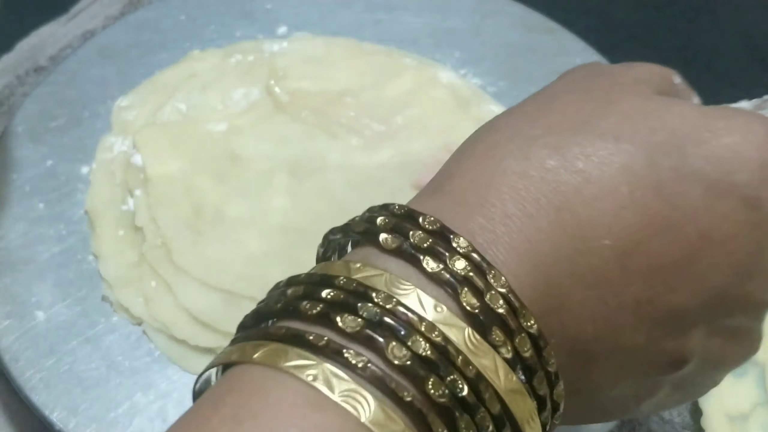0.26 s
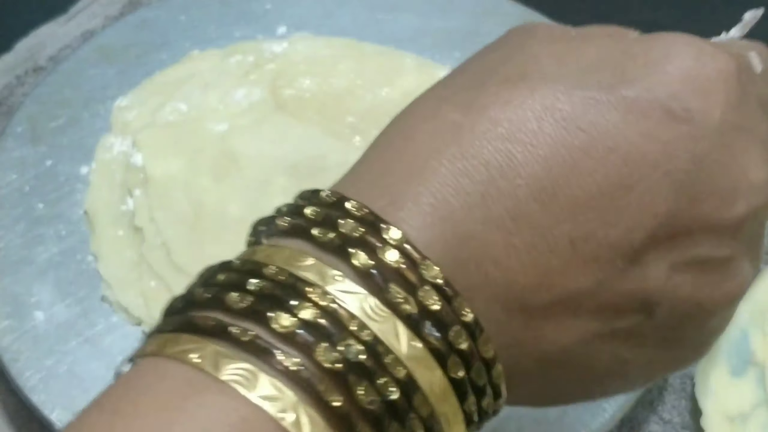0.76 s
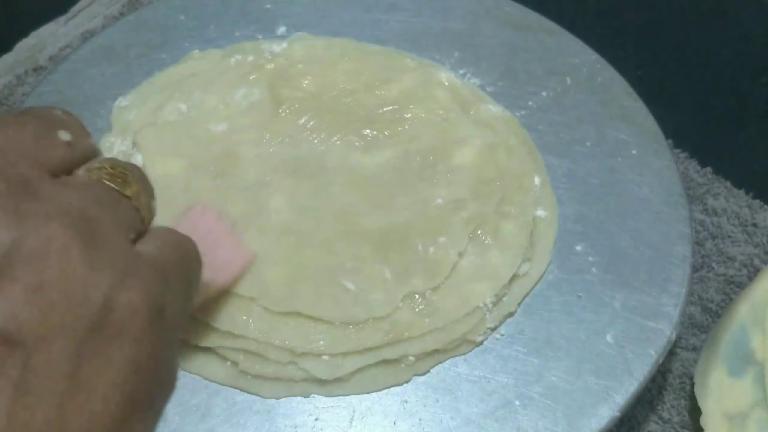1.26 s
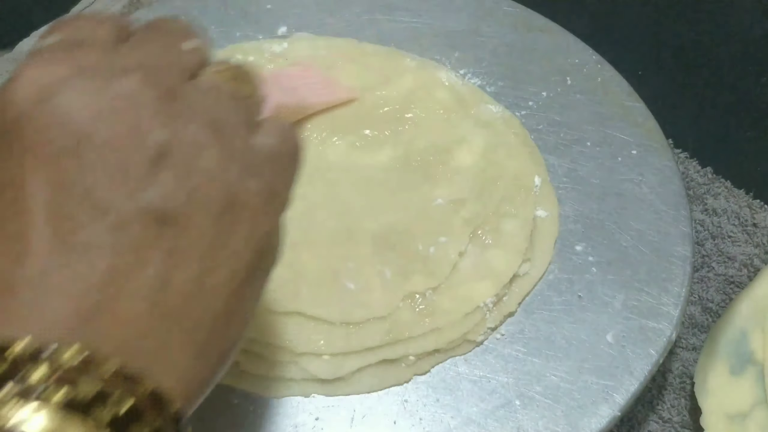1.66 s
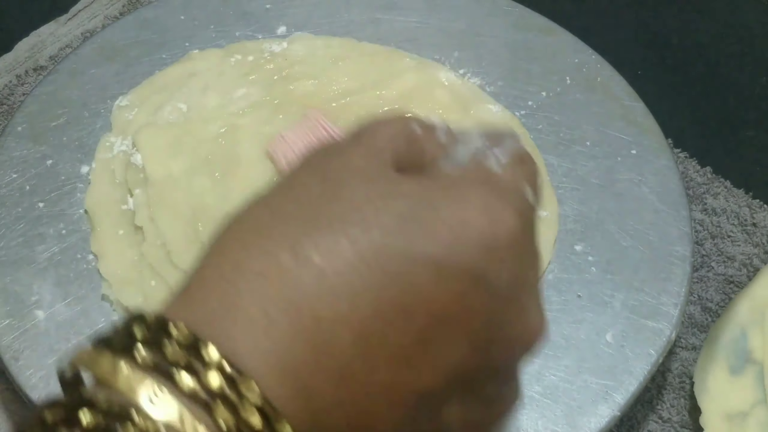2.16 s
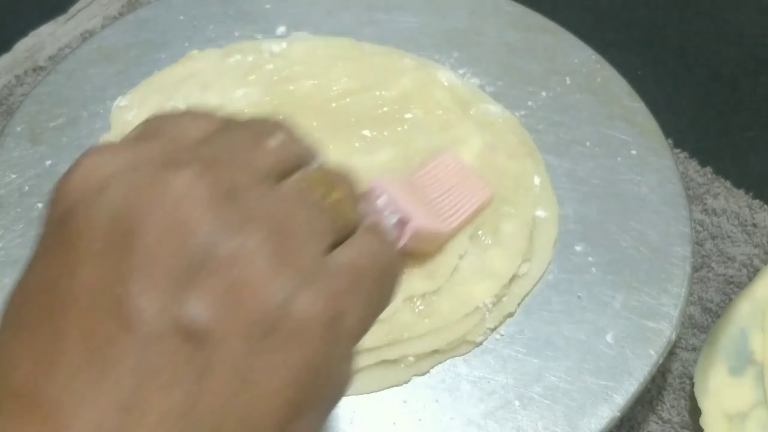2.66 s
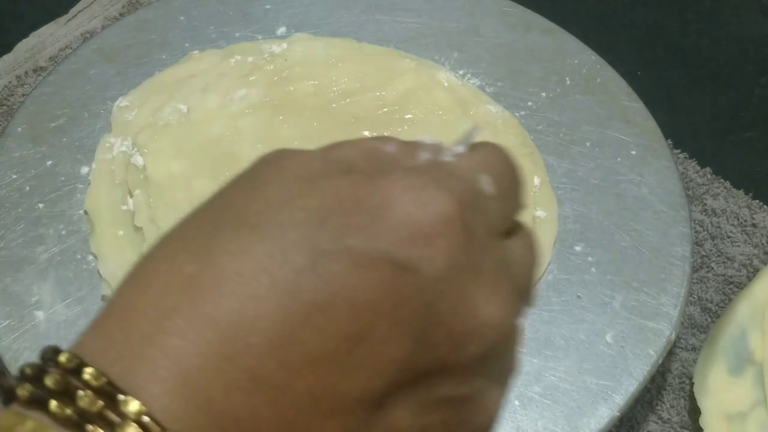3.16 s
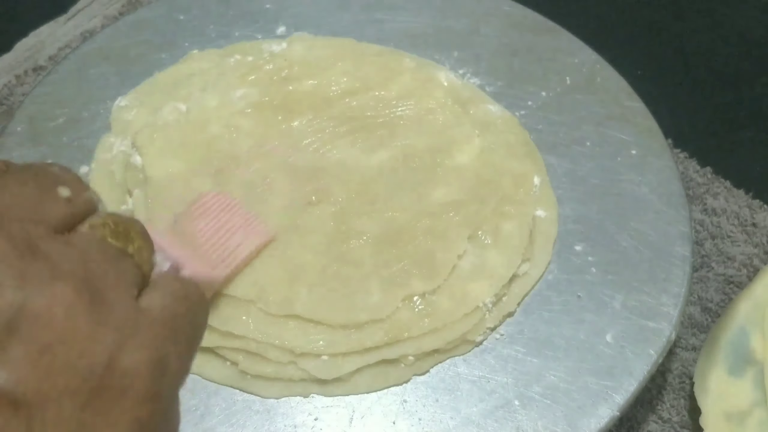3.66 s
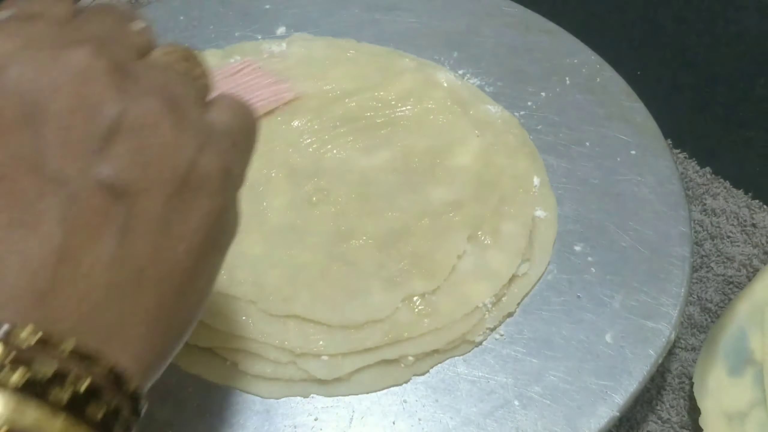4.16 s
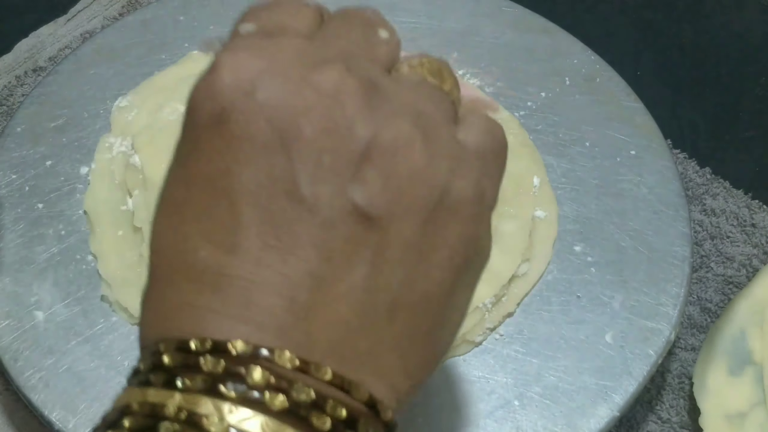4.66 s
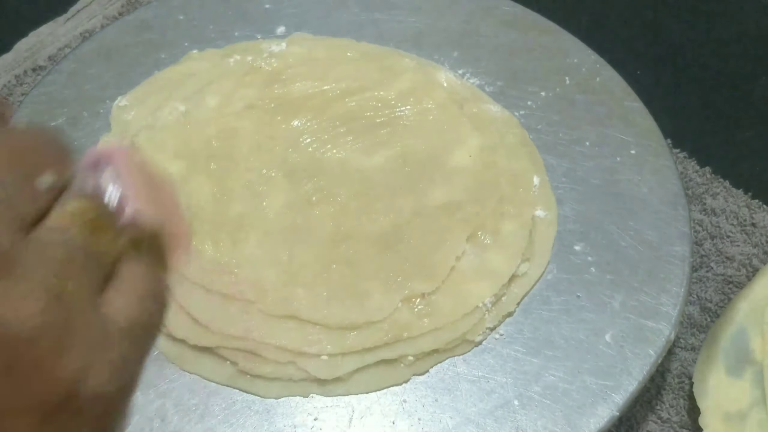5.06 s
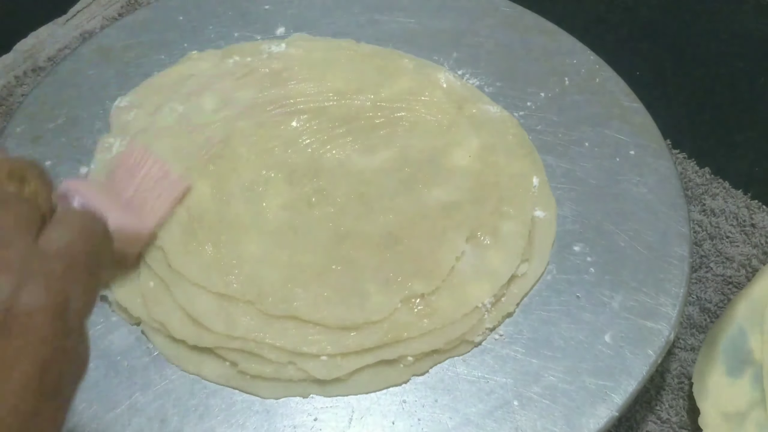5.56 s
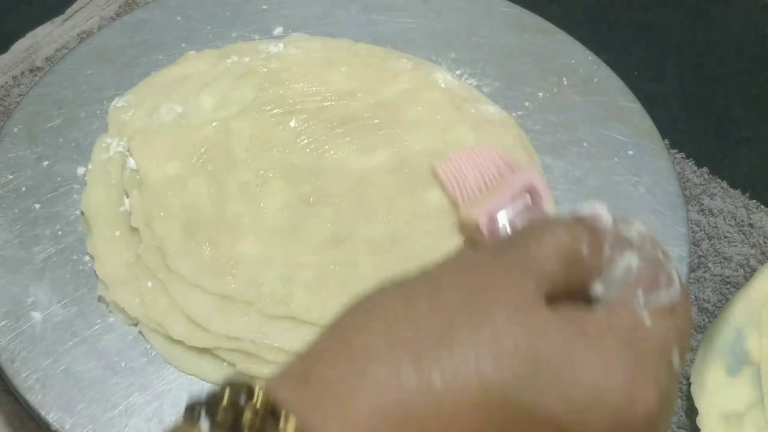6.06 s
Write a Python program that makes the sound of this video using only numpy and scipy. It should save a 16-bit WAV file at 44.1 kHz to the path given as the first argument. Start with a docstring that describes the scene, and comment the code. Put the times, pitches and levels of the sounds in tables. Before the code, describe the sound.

Metal bangles clink on a wrist close to the microphone, toward the left, as a hand brushes paste over dough in a small kitchen. Each clink is a quick, very bright chatter of tiny hits that dies almost at once, leaving a short room tail. The first second holds lighter ticks, with clearer ones near 0.4 and 0.8 seconds. Stronger clinks and clusters follow unevenly, around 1.4, 1.6, 1.9, 2.6, 3.5, 3.8, 4.0, 4.5, 5.3, 5.7 and 5.9 seconds, with smaller clicks between and a last one near 6.3 seconds. In the gaps the bangles slide with a thin hiss and the brush swishes faintly with each stroke. The hand rubs the board softly near 0.8 and 5.6 seconds and bumps it lightly at 3.8. Quiet room noise and a wavering low hum lie under everything.

```python
"""In a small kitchen, metal bangles clink on a wrist close to a phone while the hand brushes paste on dough.
Each knock is a quick chatter of tiny hits. The bangles damp each other, so they ring only briefly,
and the room carries the tail. Between knocks the bangles slide, the brush swishes faintly and the hand
rubs or bumps the board. Room noise and a wavering low hum lie under it all."""
import sys
import numpy as np
from scipy import signal
from scipy.fft import rfft, irfft
from scipy.io import wavfile
from scipy.ndimage import uniform_filter1d

SR = 44100
rng = np.random.default_rng(int(sys.argv[2]) if len(sys.argv) > 2 else 0)


def waveform_to_disk(signal):
    """Save audio, clipped to [-1, 1], as 16-bit WAV at the path in sys.argv[1]."""
    frames = np.transpose(np.atleast_2d(signal))
    scaled = np.clip(frames, -1, 1) * 32767
    samples = np.round(scaled).astype(np.int16)
    wavfile.write(sys.argv[1], SR, samples)


N = 278883

# The tone of the room noise. Each row: frequency in Hz, relative level in dB.
ROOM_COLOUR = [(18, -16), (33, 1), (46, -5), (95, -0.5), (160, -4), (235, -3), (305, -11), (400, -6),
               (680, -10), (1390, -22.5), (4300, -40.5), (7000, -48), (9500, -55), (16000, -68)]
# How alike the room noise is left and right. Each row: frequency in Hz, likeness from 0 to 1.
ROOM_LIKENESS = [(60, 0.98), (125, 0.9), (250, 0.85), (500, 0.62), (1000, 0.19), (4000, 0.014)]
# How the two hums swell and sink. Each row: time in seconds, relative level in dB.
LOW_HUM_LEVELS = [(0.0, -60), (0.7, -61), (1.65, -72), (1.76, -50), (1.95, -51), (2.12, -64), (2.55, -48),
                  (3.0, -59.5), (3.45, -53), (3.62, -61.5), (3.95, -58), (4.04, -47), (4.33, -42.5),
                  (4.54, -57), (4.7, -52), (4.83, -66), (5.0, -47), (5.4, -53), (6.0, -54), (6.32, -64)]
UPPER_HUM_LEVELS = [(0.0, -65), (1.39, -61), (1.6, -61), (3.06, -55), (3.24, -74), (3.8, -59), (4.79, -70),
                    (5.63, -52.5), (6.32, -62)]
# Weak drones around the hums. Each row: pitch in Hz, width in Hz, level in dB.
WEAK_DRONES = [(101.2, 10.5, -64.5), (183.1, 21, -63.5), (211.1, 13.7, -60.5), (239.2, 12, -65.5),
               (371.1, 10.6, -69)]
# Strokes of the arm. Each row: middle in seconds, half length in seconds,
# relative brush level in dB, relative slide level in dB.
ARM_STROKES = [(0.01, 0.12, -59, -74), (0.76, 0.15, -68, -63.5), (1.284, 0.057, -68.5, -57.5),
               (1.72, 0.27, -71.5, -63), (2.268, 0.14, -67, -63), (2.76, 0.13, -67, -60),
               (3.18, 0.083, -64.5, -73), (3.675, 0.17, -71, -62), (4.222, 0.46, -73, -61.5),
               (4.665, 0.42, -68, -59.5), (5.158, 0.27, -94, -71), (5.607, 0.22, -63.5, -60.5),
               (6.304, 0.074, -67, -58)]
# The tone of the brush and of sliding bangles. Each row: frequency in Hz, relative level in dB.
BRUSH_TONE = [(1000, -14), (2000, -2), (4200, -4), (6500, -8.5), (9000, -17.5)]
SLIDE_TONE = [(9000, -36), (10500, 7), (12000, 12), (14000, 17), (15400, 15), (15750, -20)]
# The notes a bangle rings with. Each row: pitch in Hz, relative level in dB, seconds to fade by 60 dB.
BANGLE_NOTES = [(2150, -22, .03), (3350, -12, .03), (4230, -12, 0.024), (5220, -12, 0.089),
                (5420, -11, .06), (5820, 0.5, 0.048), (6300, -10, 0.05), (6760, -6, .055),
                (7350, -3.5, 0.046), (8060, -5.5, 0.015), (10100, -14, 0.045), (11120, 1, 0.027),
                (12740, -3.5, 0.057), (14100, -12.5, .012), (15300, 0, 0.033)]
# Knocks of bangle on bangle. Each row: start in seconds, strength in dB, chatter length in seconds,
# extra snap and body in dB, the high frequency in Hz that the struck spot brings out.
BANGLE_KNOCKS = [(0.05, -44, 0.0067, -7, 11300), (0.074, -39, 0.012, 3, 11200),
                 (0.353, -42, 0.0023, 2, 11700), (0.3563, -29, 0.0038, 4, 12300),
                 (0.503, -39.5, 0.0024, -6, 11300), (0.52, -42, .002, -11, 11300),
                 (0.6038, -37.5, 0.0038, 1.5, 11000), (0.647, -47.5, .002, -3, 11400),
                 (0.8288, -22.5, 0.00097, 1.5, 11700), (0.97, -54, .002, -4, 13000),
                 (1.01, -39, 0.0082, 2.5, 11300), (1.019, -33.5, 0.0074, 0, 11000),
                 (1.0245, -28, 0.0038, -3, 11000), (1.0398, -38, 0.0018, 3.5, 11200),
                 (1.3465, -25.5, .003, -2.5, 12400), (1.3772, -20.5, 0.0052, 1, 12000),
                 (1.547, -48, .004, -6, 11500), (1.557, -22, 0.0071, 0, 10500),
                 (1.5886, -24.5, 0.011, 3, 12700), (1.5927, -19, .007, 2.5, 12200),
                 (1.872, -47.5, 0.0093, -8, 12500), (1.9495, -20, 0.01, 2.5, 11900),
                 (2.12, -43.5, 0.0042, -4, 12500), (2.133, -43, 0.0097, -3, 12500),
                 (2.144, -28.5, .011, -0.5, 12500), (2.1544, -28, 0.0039, 1.5, 14500),
                 (2.247, -47.5, 0.041, -1.5, 11900), (2.38, -47, 0.0035, -5, 11500),
                 (2.388, -38, .003, -11, 11600), (2.391, -35.5, 0.004, -2, 11800),
                 (2.57, -43, 0.0087, -2, 12500), (2.581, -30.5, 0.01, 3, 12500),
                 (2.5924, -15.5, 0.003, 2.5, 14600), (2.604, -36, 0.0087, -3, 12500),
                 (2.617, -28, 0.0052, 0, 12500), (2.784, -40, 0.011, -6, 12300),
                 (3.0834, -26, 0.0046, 0, 11600), (3.186, -41.5, .003, -1.5, 12500),
                 (3.279, -43.5, 0.0066, -5, 12300), (3.427, -25.5, 0.01, 2, 11900),
                 (3.472, -19, 0.0051, 5, 14400), (3.488, -25.5, 0.006, -2.5, 14200),
                 (3.732, -46, 0.005, -6, 12000), (3.7466, -37.5, 0.0096, -8, 12200),
                 (3.7883, -18.5, 0.0048, 1, 12160), (3.998, -21, 0.0043, 0, 13600),
                 (4.007, -28, 0.0078, 1, 12500), (4.02, -23.5, 0.0092, 2, 12500),
                 (4.441, -51, 0.011, -6, 12500), (4.4795, -18.5, 0.0034, -1.5, 11700),
                 (4.635, -25, 0.0027, -2, 14900), (4.663, -30.5, 0.013, 2.5, 13000),
                 (4.693, -33.5, 0.0067, 0, 12700), (4.921, -51, .008, -10, 12100),
                 (4.9388, -30.5, 0.0087, -3, 11850), (5.278, -24, 0.002, -3, 13700),
                 (5.289, -31, 0.003, 2.5, 13600), (5.309, -29, 0.011, 2.5, 13000),
                 (5.426, -43, 0.0028, -6, 12600), (5.4645, -40, 0.0022, 1, 12700),
                 (5.654, -36.5, 0.0062, -3, 12600), (5.6822, -17.5, 0.0039, 2, 12000),
                 (5.691, -24, 0.0044, 1.5, 11900), (5.917, -41, 0.0044, -1, 12400),
                 (5.93, -35, 0.0044, -3, 12800), (5.9373, -25, 0.0021, 4.5, 13700),
                 (5.94, -24.5, 0.0059, -3, 13000), (6.2598, -30, 0.0087, -4, 12000),
                 (6.271, -27.5, 0.004, 0, 12200)]
# A knock's dry snap, body and bright top. Each row: frequency in Hz, relative level in dB.
SNAP_TONE = [(1100, -25.5), (1900, -1), (2700, -6.5), (4200, -5.5), (7000, 2.5), (8400, -2.5), (9600, -27),
             (11000, -58.5)]
BODY_TONE = [(900, -23), (1900, -6.5), (3300, -9.5), (4900, -0.5), (5600, 8.5), (6900, 1), (7600, -6.5),
             (8300, -10.5), (9100, -16), (11000, -43)]
BRIGHT_TONE = [(9000, -59), (9800, -16.5), (10450, -2), (11100, 4), (12500, -1.5), (13500, 2), (15400, -3),
               (15700, -4), (16600, -45)]
# The hand and brush on the board: rubs, a bump and a short brush swish. Each row: middle in seconds, half
# length in seconds, pitch in Hz, width in Hz, level in dB.
RUBS_AND_BUMPS = [(0.812, 0.19, 600, 200, -58.5), (3.807, 0.033, 90, 72, -45),
                  (4.594, 0.026, 4100, 1100, -63.5), (5.65, 0.11, 616, 770, -57)]


def undb(db):
    """Turn decibels into a number to multiply by."""
    return 10 ** (np.asarray(db) / 20)


def unit(x):
    """Scale a sound to an average (rms) level of 1."""
    return x / np.sqrt(np.mean(x ** 2))


def curve(rows):
    """Join (seconds, value) rows with straight lines."""
    return np.interp(np.arange(N) / SR, *np.transpose(rows))


def over_bins(points, size):
    """Spread (Hz, value) points over every frequency of a spectrum, on a log scale."""
    hz, value = np.transpose(points)
    return np.interp(np.log(np.fft.rfftfreq(size, 1 / SR) + 1), np.log(hz), value)


def colour(x, points, size=2048):
    """Give a sound the tone drawn by (Hz, dB) points; white noise keeps its power."""
    cepstrum = irfft(np.log(unit(undb(over_bins(points, size)))))
    cepstrum[1:size // 2] *= 2  # fold the filter so it never sounds ahead of a hit
    cepstrum[size // 2 + 1:] = 0
    return signal.oaconvolve(x, irfft(np.exp(rfft(cepstrum))))[:len(x)]


def fade(t, t60):
    """Die away by 60 dB in t60 seconds."""
    return np.exp(-np.log(1000) * t / t60)


def swell(s, half_s):
    """A smooth rise and fall around time s."""
    return np.exp(-((np.arange(N) / SR - s) / half_s) ** 2)


def noise_band(hz, width):
    """Noise gathered around one pitch, at level 1."""
    bins = np.fft.rfftfreq(N, 1 / SR)
    return unit(irfft(rfft(rng.standard_normal(N)) / (1 + (2 * (bins - hz) / width) ** 2), N))


def at_peak(x, db):
    """Scale a burst so that its loudest 4 ms have this level."""
    return x * undb(db) / np.sqrt(uniform_filter1d(x ** 2, size=176, mode="constant").max())


def add(track, s, x):
    """Mix a short sound into a track, s seconds in."""
    start = max(int(s * SR), 0)
    track[start:start + len(x)] += x[:max(len(track) - start, 0)]


def right_side(db):
    """Left and right gains that change only the right side."""
    return undb([[0], [db]])


def room_noise(level_db=-52, hiss_db=-75):
    """Noise from all around, alike in both ears only in the bass, plus a thin even hiss."""
    likeness = np.clip(over_bins(ROOM_LIKENESS, N), 0, 1)
    tone = undb(over_bins(ROOM_COLOUR, N))
    mid, side = (irfft(rfft(rng.standard_normal(N)) * tone * np.sqrt(1 + sign * likeness), N)
                 for sign in (1, -1))
    rumble = np.array([mid + side, mid - side]) / np.std(mid)
    return undb(level_db) * rumble + undb(hiss_db) * rng.standard_normal((2, N))


def wavering_tone(hz, width_hz, waver=0.7):
    """A pure tone that wavers because noise close to its pitch beats against it."""
    tone = np.sqrt(2) * np.sin(2 * np.pi * hz * np.arange(N) / SR)
    return unit(tone + waver * noise_band(hz, width_hz))


def hum():
    """Two low hums, each swelling on its own, with weaker drones around them."""
    low = wavering_tone(hz=86.3, width_hz=10) * undb(curve(LOW_HUM_LEVELS) - 1)
    upper = wavering_tone(hz=126.1, width_hz=4.5) * undb(curve(UPPER_HUM_LEVELS) - 2.5)
    drones = sum(undb(db) * noise_band(hz, width) for hz, width, db in WEAK_DRONES)
    return low + upper + drones


def stroke_gains(brush_rest_db=-70, slide_rest_db=-73.5):
    """Brushing and sliding grow with the speed of each arm stroke; a little remains between strokes."""
    brush_gain, slide_gain = undb(brush_rest_db), undb(slide_rest_db)
    for s, half_s, brush_db, slide_db in ARM_STROKES:
        speed = swell(s, half_s)
        brush_gain = np.hypot(brush_gain, undb(brush_db) * speed)
        slide_gain = np.hypot(slide_gain, undb(slide_db) * speed)
    return brush_gain, slide_gain


def rub(tone, grain_db):
    """Rubbing is a crowd of tiny slips of uneven size."""
    noise = rng.standard_normal(N)
    slip_db = grain_db * np.repeat(rng.standard_normal(N // 64 + 1), 64)[:N]
    return colour(unit(noise * undb(slip_db)), tone)


def brush():
    """The brush rubs over wet dough, with its own swish in each ear."""
    return np.array([rub(BRUSH_TONE, grain_db=2.5) for _ in range(2)])


def slide(rattle_db=-8.5):
    """Bangle rubs along bangle, with a softer rattle mixed in."""
    return rub(SLIDE_TONE, grain_db=2) + undb(rattle_db) * rattle()


def rattle(ticks_per_s=43, scatter_db=8, tick_t60=0.027):
    """Loose bangles tick against each other at random, each tick with a little ring."""
    t = np.arange(SR // 6) / SR
    ticks = rng.random(N) < ticks_per_s / SR
    sizes = undb(scatter_db * np.clip(rng.standard_normal(N), -2, 2))
    cracks = signal.oaconvolve(ticks * sizes, fade(t, tick_t60))[:N] * rng.standard_normal(N)
    rung = signal.oaconvolve(cracks, ringing(t))[:N]
    return unit(colour(rung, BRIGHT_TONE))


def ringing(t, detune=0.0401, bangles=2, ring_gain=0.016):
    """A click and the short ring of nearby bangles, each tuned a bit apart and hit at its own spot."""
    sound = signal.unit_impulse(len(t))
    for hz, db, t60 in BANGLE_NOTES * bangles:
        shift, spot = rng.standard_normal(2)
        strength = ring_gain * (1 + np.tanh(spot) / 2) * undb(db)
        sound += strength * np.cos(2 * np.pi * hz * (1 + detune * shift) * t) * fade(t, t60)
    return sound


def struck_spot(x, hz, lift_db=13.5, width_hz=870):
    """The spot where two bangles meet brings out one part of their treble."""
    bins = np.fft.rfftfreq(len(x), 1 / SR)
    lift = undb(lift_db * np.exp(-((bins - hz) / width_hz) ** 2))
    margin = SR // 1000
    return irfft(rfft(np.roll(x, margin)) * lift, len(x))[margin:]


def chatter(t, length_s, bounces_per_s=1300, first_hit=1.8):
    """A hard hit, then weaker bounces that settle to a faint rattle; each cracks through the stack."""
    bounces = rng.random(len(t)) < bounces_per_s / SR
    force = np.exp(-(t / max(length_s, 1e-3)) ** 4) + 0.07 * fade(t, t60=0.055)
    click = signal.unit_impulse(len(t))
    crack = click + 0.55 * rng.standard_normal(len(t)) * fade(t, t60=0.008)
    return signal.fftconvolve(first_hit * click + bounces * force, crack)[:len(t)]


def knocks(typical_db=-27):
    """Bangle strikes bangle. Gives snap, body and bright top, both direct and as sent into the room."""
    t = np.arange(SR // 10) / SR
    direct, to_room = np.zeros((2, 3, N))
    for s, strength_db, length_s, extra_db, spot_hz in BANGLE_KNOCKS:
        ring = struck_spot(ringing(t), spot_hz)
        other_ring = ringing(t)
        contacts = chatter(t, length_s)
        # Harder knocks sound brighter: snap and body grow more slowly than the top.
        snap_db = -50 + 0.75 * (strength_db - typical_db) + extra_db
        body_db = -48 + 0.54 * (strength_db - typical_db) + extra_db
        parts = [(SNAP_TONE, snap_db), (BODY_TONE, body_db), (BRIGHT_TONE, strength_db - 1)]
        for part, (tone, db) in enumerate(parts):
            hit = at_peak(signal.fftconvolve(contacts, colour(ring, tone))[:len(t)], db)
            add(direct[part], s, hit)
            # Over many directions the chatter partly evens out: half the room's energy
            # is one smooth clink in which other bangles stand out.
            smooth_clink = unit(colour(other_ring, tone)) * np.std(hit)
            add(to_room[part], s, hit / np.sqrt(2))
            add(to_room[part], s + length_s / 2, smooth_clink / np.sqrt(2))
    return direct, to_room


def kitchen(x, early_db, late_db, early_t60=0.079, late_t60=0.42, gap_s=0.0012):
    """Quick echoes from the board and counter, then the tail of a small hard room."""
    t = np.arange(SR // 2) / SR
    arrival = 1 - np.exp(-(t / gap_s) ** 2)
    early, late = (unit(arrival * fade(t, t60)) / np.sqrt(len(t)) for t60 in (early_t60, late_t60))
    envelope = np.hypot(undb(early_db) * early, undb(late_db) * late)
    out, step = np.zeros((2, N)), N // 32
    for start in range(0, N, step):  # the echo pattern changes as the wrist moves
        for side in out:
            echoes = envelope * rng.standard_normal(len(t))
            add(side, start / SR, signal.fftconvolve(x[start:start + step], echoes))
    return out


def hand_and_brush_on_board():
    """Each soft rub or bump of the hand, or swish of the brush, is a brief swell of noise around one pitch."""
    return sum(undb(db) * swell(s, half_s) * noise_band(hz, width)
               for s, half_s, hz, width, db in RUBS_AND_BUMPS)


def scene():
    """The wrist is by the left microphone; the phone's body shields the right one from the top treble."""
    (snap, body, bright), (_, body_to_room, bright_to_room) = knocks()
    clinks = bright * right_side(db=-24.5) + body * right_side(db=-31)
    clinks += kitchen(bright_to_room, early_db=-3, late_db=-10) * right_side(db=-11.5)
    clinks += kitchen(body_to_room, early_db=-1, late_db=-6) * right_side(db=0.5)
    clinks += kitchen(snap, early_db=-4, late_db=-6, early_t60=0.007, gap_s=0.00013) * right_side(db=-2)
    brush_gain, slide_gain = stroke_gains()
    brushing = undb(1) * brush_gain * brush()
    sliding = undb(-1) * slide_gain * slide()
    around = brushing + hand_and_brush_on_board() + hum() + room_noise()
    return clinks + sliding * right_side(db=-17.5) + around * right_side(db=-0.88)


def record(dry, top_hz=16500):
    """The phone cuts off the very highest sounds."""
    return signal.sosfilt(signal.ellip(8, .2, 70, top_hz, fs=SR, output="sos"), dry)


dry = scene()
out = record(dry)
waveform_to_disk(out)
```